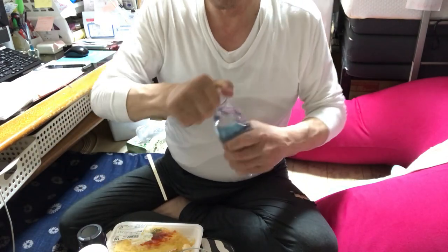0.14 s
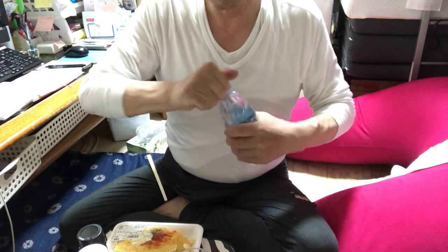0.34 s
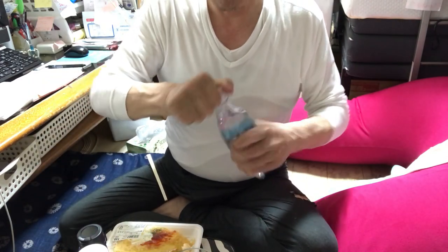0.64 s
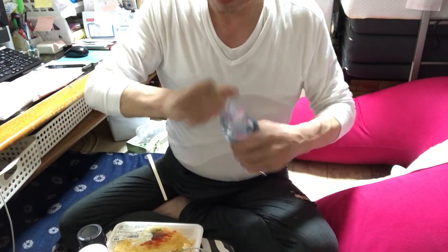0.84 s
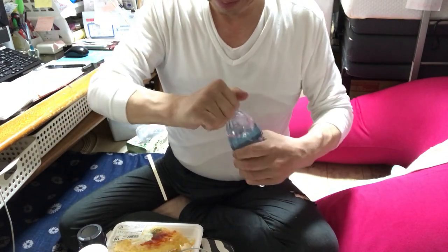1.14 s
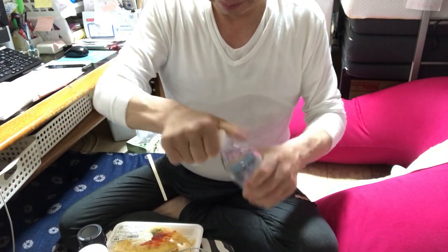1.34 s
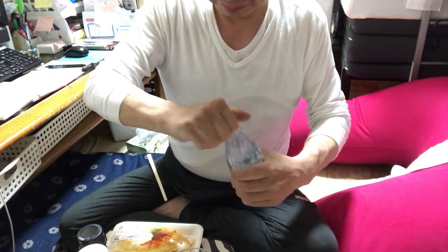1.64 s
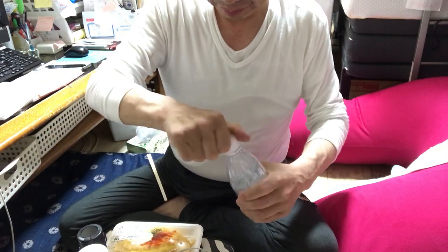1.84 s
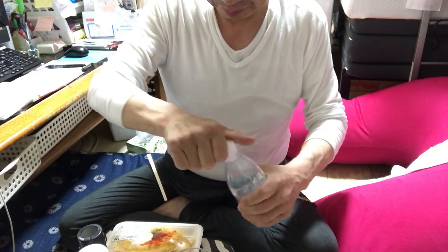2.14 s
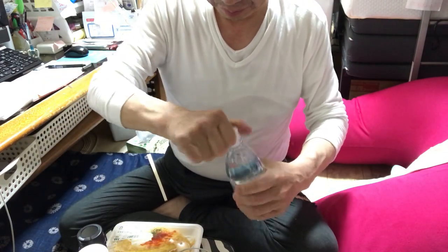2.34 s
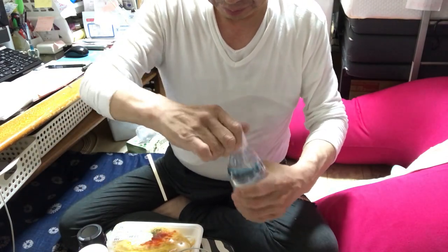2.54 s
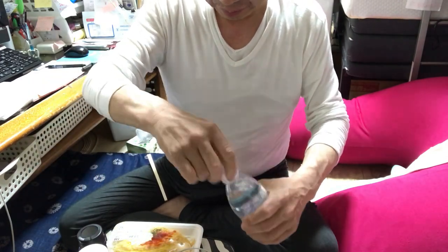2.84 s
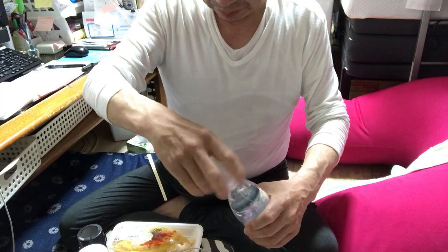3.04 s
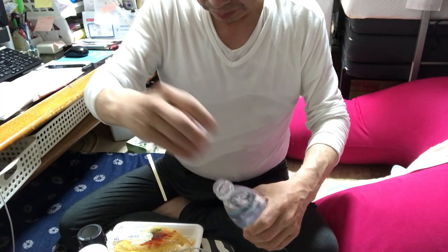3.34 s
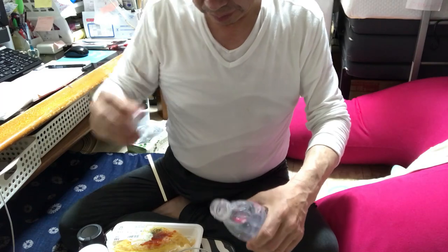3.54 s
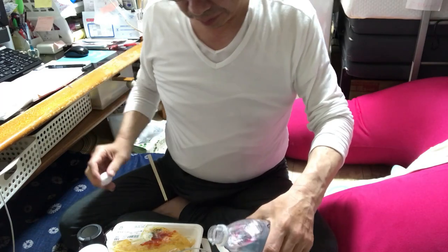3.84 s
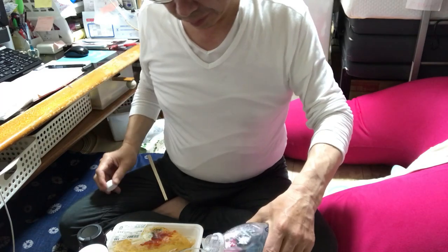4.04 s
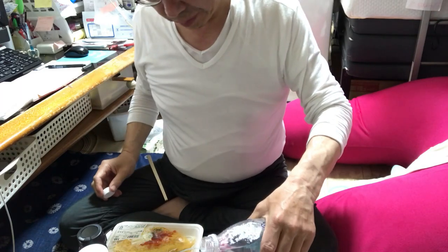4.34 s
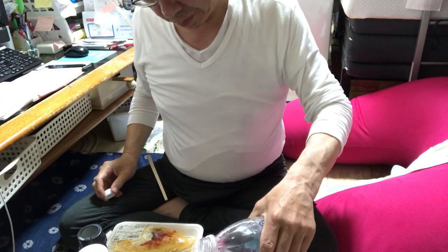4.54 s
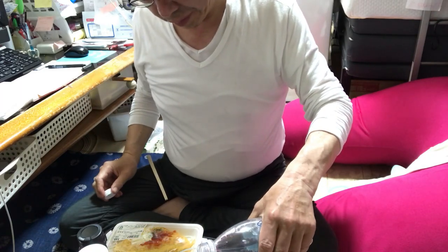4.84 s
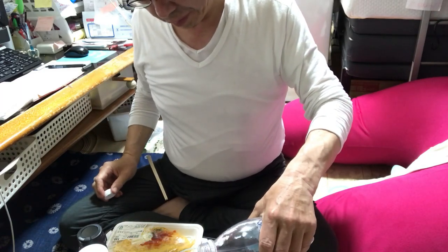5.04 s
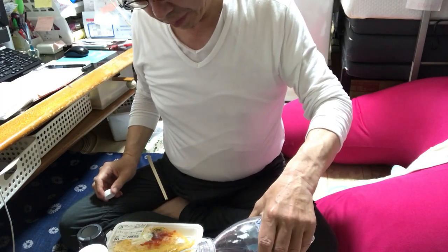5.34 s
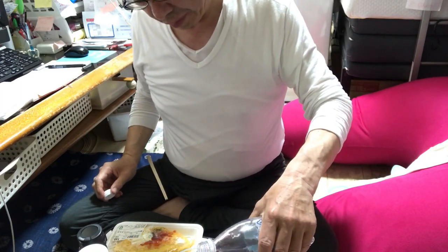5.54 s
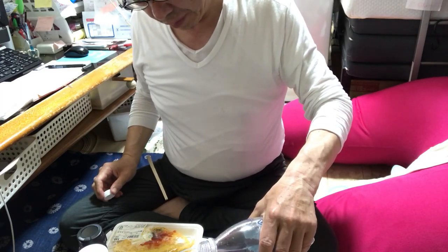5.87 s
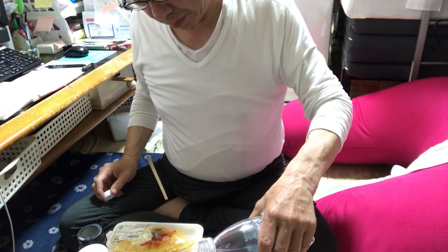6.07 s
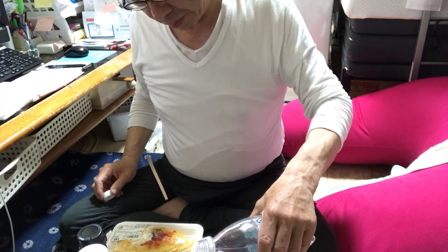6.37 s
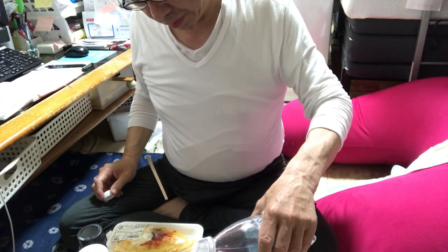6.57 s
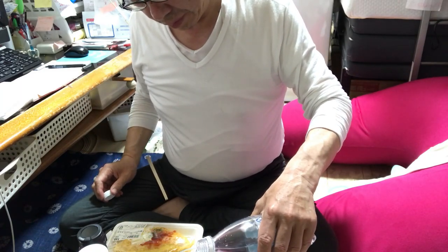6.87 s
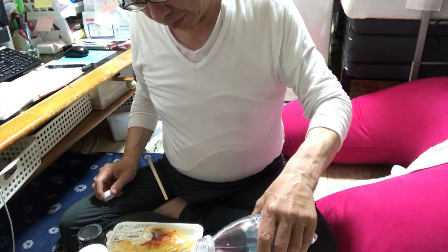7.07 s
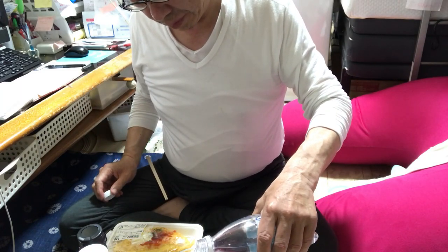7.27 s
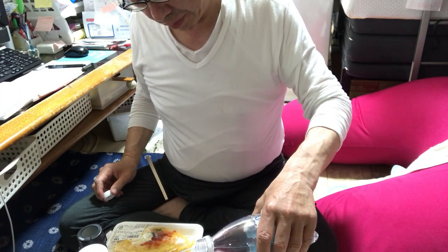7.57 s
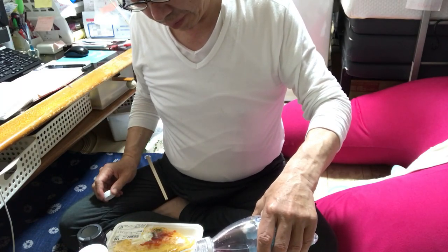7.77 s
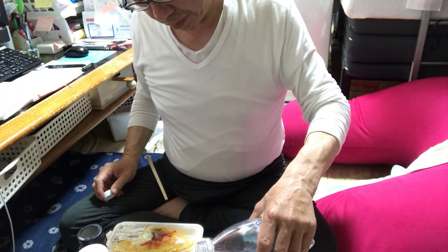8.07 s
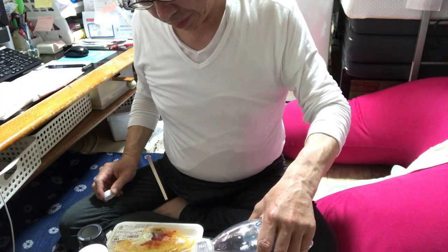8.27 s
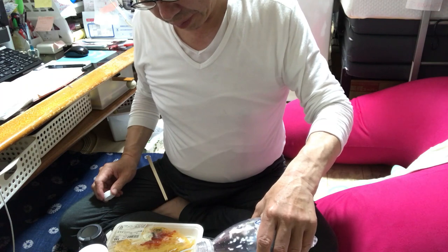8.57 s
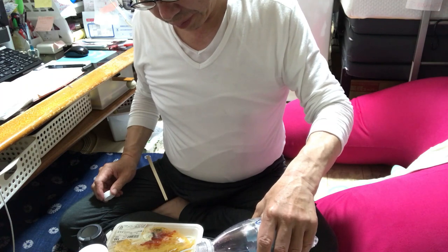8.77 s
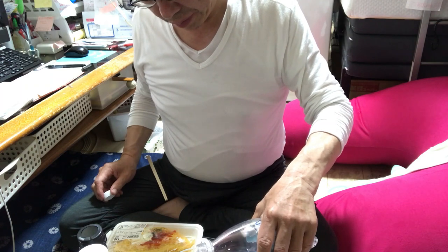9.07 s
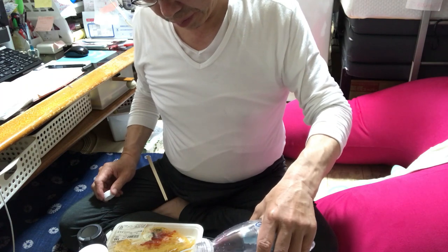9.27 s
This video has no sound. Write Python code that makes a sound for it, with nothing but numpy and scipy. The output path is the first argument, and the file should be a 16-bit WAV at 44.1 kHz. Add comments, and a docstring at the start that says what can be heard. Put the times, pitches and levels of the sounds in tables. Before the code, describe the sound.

Fingers rub a thin plastic bottle, then gas escapes in three separate bright hisses, closing with a muted pop. The cap ring cracks sharply, the loudest moment, and the cap ticks loosely off its thread. Later, soft sizzling drink fills a cup in several gushes, its hollow note mostly rising among liquid plops. Close microphone, dry little room, low humming appliance and faint air behind.

```python
"""In a small, well-damped room a thin plastic bottle of fizzy drink is opened and poured.
Three twists of the cap let gas hiss out as turbulent noise; the last ends in a dull pop. The cap's ring
snaps with a crack and ringing modes, and the cap ticks and scrapes off its thread under rubbing fingers.
The drink fizzes into a cup as dense grains, with a resonance that mostly rises and a few ringing plops.
An appliance hums in slow throbs over faint air noise and rumble."""
import sys
import numpy as np
from scipy import signal
from scipy.fft import rfft, irfft, next_fast_len
from scipy.io import wavfile

SR = 44100
rng = np.random.default_rng(int(sys.argv[2]) if len(sys.argv) > 2 else 0)


def unload_audio(sound):
    """Save the sound as a 16-bit wav file, at the path given as the first command line argument."""
    columns = np.transpose(np.atleast_2d(sound))
    # keep every value between -1 and 1, then stretch to whole-number steps
    steps = np.round(np.clip(columns, -1, 1) * 32767)
    wavfile.write(sys.argv[1], SR, steps.astype(np.int16))


N = 414981
TIME = np.arange(N) / SR


def from_db(db):
    """Logarithmic level to amplitude gain."""
    return 10 ** (np.asarray(db) / 20)


def rms_one(x):
    """Power normalisation: scale to unit mean square."""
    return x / np.sqrt(np.mean(x ** 2) + 1e-20)


def in_time(rows):
    """Linear interpolation: each column after the first (time_s), sample by sample."""
    time_s, *columns = np.transpose(rows)
    return [np.interp(TIME, time_s, column) for column in columns]


def during(start_s, end_s, edge_s=0.0049):
    """Gating: one between two times, with linear ramps centred on them."""
    return np.clip(np.minimum(TIME - start_s, end_s - TIME) / edge_s + .5, 0, 1)


def swell(start_s, end_s, rise_s, fall_s):
    """Exponential growth up to start_s, hold at one, exponential decay from end_s (time constants)."""
    exponent = np.minimum((TIME - start_s) / rise_s, (end_s - TIME) / fall_s).clip(None, 0)
    return np.exp(np.maximum(exponent, -20))


def noise(size=N):
    """White noise: equal power at all frequencies."""
    return rng.standard_normal(size)


def grains(per_s, spread_db):
    """Random point process: tiny clicks at random times, mostly weak, a few strong."""
    sizes = from_db(spread_db * np.minimum(rng.exponential(1, N), 5))
    signs = rng.choice([-1, 1], N)
    return sizes * signs * (rng.random(N) < per_s / SR)


def band(x, low_hz, high_hz):
    """Causal band-pass filtering."""
    sos = signal.butter(2, [low_hz, min(high_hz, .45 * SR)], "band", fs=SR, output="sos")
    return signal.sosfilt(sos, x)


def low_pass(x, cutoff_hz):
    """Zero-phase low-pass filtering, so that bands can be split by subtraction."""
    return signal.sosfiltfilt(signal.butter(4, cutoff_hz, fs=SR, output="sos"), x)


def coloured(x, spectrum):
    """Spectral shaping by (frequency_hz, density_db), falling away beyond its ends; unit power."""
    hz, db = np.transpose(spectrum)
    size = next_fast_len(len(x))
    f = np.maximum(np.fft.rfftfreq(size, 1 / SR), 1)
    beyond_ends = np.minimum(1, np.minimum(f / hz[0], hz[-1] / f)) ** 2
    gain = from_db(np.interp(np.log(f), np.log(hz), db)) * beyond_ends
    return rms_one(irfft(rfft(x, size) * gain, size)[:len(x)])


def narrow_noise(hz, width_hz, size=N):
    """Noise-driven resonance: two-pole low-passed noise moved up to hz, which may glide; unit power."""
    r = np.exp(-2 * np.pi * width_hz / SR)  # width_hz is the corner of each pole
    slow = signal.lfilter([1], [1, -2 * r, r * r], noise((2, size)))
    phase = 2 * np.pi * np.cumsum(hz + np.zeros(size)) / SR
    return rms_one(slow[0] * np.cos(phase) + slow[1] * np.sin(phase))


def brief_tone(start_s, end_s, hz, width_hz, edge_s):
    """Gated resonance: it sounds only between two times."""
    out = during(start_s, end_s, edge_s)
    sounding = np.flatnonzero(out)
    if len(sounding):
        out[sounding] *= narrow_noise(hz, width_hz, size=len(sounding))
    return out


def decay(t60_s, size=4096):
    """Exponential damping: 60 dB down after t60_s."""
    return from_db(-60 * TIME[:size] / t60_s)


def ring(hz, t60_s, size=4096):
    """Free vibration of one struck mode."""
    return np.sin(2 * np.pi * hz * TIME[:size]) * decay(t60_s, size)


def crack(spectrum, t60_s, rise_t60_s=0.00069, size=4096):
    """Impulsive fracture: a noise burst that builds up and dies at once, steady in strength."""
    envelope = decay(t60_s, size) * (1 - decay(rise_t60_s, size))
    burst = coloured(noise(size), spectrum) * envelope
    return rms_one(burst) * np.sqrt(np.mean(envelope ** 2))


def add(out, start_s, sound):
    """Superposition: mix a short sound in at a time."""
    at = round(start_s * SR)
    out[at:at + len(sound)] += sound[:N - at]


# Each twist opens a leak that swells once into a surge, then shuts:
# fully_open_s, closing_from_s, leak_db, opening_db_per_s, closing_db_per_s, surge_s, surge_db,
# surge_sigma_s, last_chuff_db (re flow), first_sizzle_db (re flow)
CAP_TWISTS = [(0.76, 1.062, -33.7, 2800, 380, 0.826, -28.3, 0.028, -19.5, -6.5),
              (1.19, 1.472, -38.4, 450, 560, 1.251, -28, 0.04, -14, -1.5),
              (1.572, 1.666, -37, 1250, 570, 1.641, -20.8, 0.036, -18, -6)]
LEAK_SAG_DB_PER_S = 15.5  # the pressure behind the leak runs down
SEEP_DB = -65  # gas that still seeps out between the first two twists
CHUFF_DB, SIZZLE_DB = -14.5, 0  # re flow: chuff at the start of a twist, sizzle at its end


def gas_flow():
    """Pressure-driven leakage: strength of the jet's middle, hollow chuff and high sizzle over all twists."""
    seep = from_db(SEEP_DB) * during(CAP_TWISTS[0][1], CAP_TWISTS[1][0])
    power = (seep * from_db([[0], [CHUFF_DB], [SIZZLE_DB]])) ** 2
    for (start, end, leak_db, opening, closing, surge_s, surge_db, sigma_s,
         last_chuff_db, first_sizzle_db) in CAP_TWISTS:
        gap_db = np.minimum(opening * (TIME - start), closing * (end - TIME))
        gap = from_db(np.clip(gap_db, -200, 0))
        leak = from_db(leak_db - LEAK_SAG_DB_PER_S * np.maximum(TIME - start, 0))
        surge = from_db(surge_db) * np.exp(-.5 * np.minimum(((TIME - surge_s) / sigma_s) ** 2, 20))
        # the sizzle brightens; the chuff thins in the first and third twists and holds in the second
        colour_db = in_time([(start, 0, CHUFF_DB, first_sizzle_db), (end, 0, last_chuff_db, SIZZLE_DB)])
        power = power + (gap * np.hypot(leak, surge) * from_db(colour_db)) ** 2
    return np.sqrt(power)


# Spectrum of the jet, later split into three bands: frequency_hz, density_db
JET_SPECTRUM = [(550, -37), (750, -28), (1080, -13.5), (1300, -17.5), (1650, -11), (1950, -2.5),
                (2230, -10), (2500, -3.5), (3000, -5), (4400, 0), (6500, 1), (8500, -0.5), (13500, 0.5),
                (15800, -3)]
# Resonances of the gap under the cap, which changes with each twist:
# start_s, end_s, pitch_hz, width_hz, level_db (re the flow)
GAP_RESONANCES = [(0.80, 0.87, 3370, 53, -10.5), (0.8, 1.0, 2650, 230, -19), (1.1, 1.5, 2050, 120, -21),
                  (0.88, 1.0, 4400, 380, -10), (1.2, 1.32, 2620, 290, -10.5), (1.15, 1.5, 2420, 130, -13.5),
                  (1.55, 1.655, 6850, 550, -10.5), (1.58, 1.68, 1050, 150, -21.5),
                  (0.78, 1.07, 14000, 900, -8), (1.655, 1.72, 13500, 900, -14)]


def gas(flutter_db=0.7):
    """Turbulent jet noise: gas leaves through the thread and excites the gap under the cap."""
    flow, chuff, sizzle = gas_flow()
    jet = coloured(grains(per_s=22000, spread_db=2.0), JET_SPECTRUM)
    low, low_and_middle = low_pass(jet, 2100), low_pass(jet, 11700)
    sound = chuff * rms_one(low)
    sound += flow * rms_one(low_and_middle - low)
    sound += sizzle * rms_one(jet - low_and_middle)
    tones = sum(from_db(db) * brief_tone(start, end, hz, width, edge_s=0.021)
                for start, end, hz, width, db in GAP_RESONANCES)
    flutter = from_db(flutter_db * narrow_noise(0, width_hz=45))
    return flutter * (sound + flow * tones)


POP_S, POP_DB = 1.656, -31  # the seal lets go
SNAP_S, SNAP_DB = 2.467, -17  # the cap's ring breaks
# Spectrum of the seal's pop: frequency_hz, density_db
POP_SPECTRUM = [(500, -8), (740, -17.5), (1100, 2.5), (1400, -6), (2500, -3), (5000, -1.5), (9000, -16.5)]
# Modes of the wall springing back: pitch_hz, level_db, t60_s
WALL_MODES = [(85, -46.5, .12), (135, -39.5, 0.075), (200.4, -39.5, .045), (275, -40, .035),
              (360, -36, 0.035), (490, -34, 0.027)]
# Spectrum of the breaking ring: frequency_hz, density_db
SNAP_SPECTRUM = [(200, -15), (400, -8), (620, -13), (880, -5), (1150, 2.5), (1700, -1), (2250, -12),
                 (2800, -11.5), (4150, 4), (5000, -3), (6300, -2.5), (8300, -12), (9900, -7), (10800, -12),
                 (15000, -11)]
# Modes of the cap: pitch_hz, level_db (before modes_db), t60_s
CAP_RING_MODES = [(1173, 2.5, 0.022), (1280, 3, 0.016), (1510, 3, 0.014), (1740, 4, 0.015),
                  (2870, -5, 0.031), (3820, -8, .025), (4270, -1, 0.022), (6000, -15, .02)]


def cap(modes_db=-28, rattle_db=-24):
    """Impulsive release and modal ringing: the seal pops; later the ring cracks and the thin wall rattles."""
    out = np.zeros(N)
    add(out, POP_S, from_db(POP_DB) * crack(POP_SPECTRUM, t60_s=.035))
    for k, (hz, db, t60_s) in enumerate(WALL_MODES):
        add(out, POP_S, (-1) ** k * from_db(db) * ring(hz, t60_s))  # neighbours in opposite phase
    add(out, SNAP_S, from_db(SNAP_DB) * crack(SNAP_SPECTRUM, t60_s=0.014))
    rattle = crack([(1200, -17), (2500, 4), (3800, 6), (6500, -3)], t60_s=0.15)
    add(out, SNAP_S, from_db(SNAP_DB + rattle_db) * rattle)
    for k, (hz, db, t60_s) in enumerate(CAP_RING_MODES):
        add(out, SNAP_S, (-1) ** k * from_db(modes_db + db) * ring(hz, t60_s))
    return out


# Spectrum of plastic scraping on plastic, also used by thread(): frequency_hz, density_db
SCRAPE_SPECTRUM = [(400, 10), (800, -4), (1200, 2), (2200, -1.5), (3300, -0.5), (5000, -12), (6500, -6),
                   (9000, -19), (15000, -19)]
# Ticks of cap, thread and bottle wall, all levels before the common gains below:
# start_s, level_db, low_db, middle_db, high_db (these three re level_db), pitch_hz
PLASTIC_TICKS = [(0.289, -51, -35, -5.5, -12, 1700), (0.422, -48, -18, -13.5, -21, 444),
                 (0.544, -39, -17, -32, -25, 1130), (0.706, -47, -13, -15, -26, 1460),
                 (0.758, -25, -23, -11.5, -26, 2600), (2.067, -30.5, -52, -27, -8, 8800),
                 (2.142, -38, -22, -19, -26, 2280), (2.162, -50.5, -23, -8, -5, 5090),
                 (2.641, -52.5, -30, -10, -7, 708), (2.682, -48.5, -8.5, -20, -28, 1620),
                 (2.816, -38.5, -16, -7, -29, 3020), (2.906, -40, -14.5, -10, -26, 2280),
                 (2.911, -43, -14, -5.5, -24, 1310), (2.925, -47, -8, -10, -20, 2150),
                 (2.929, -32.5, -17, -12.5, -27, 1060), (3.003, -37.5, -9, -10, -34, 1880),
                 (3.031, -47, -8, -14, -24, 1060), (3.101, -26, -22.5, -22, -33, 2270),
                 (3.115, -38, -13, -17, -28, 436), (3.123, -34.5, -15, -12, -14, 500),
                 (3.191, -34.5, -22, -23, -35, 450), (3.31, -47, -11, -12, -18, 2550),
                 (3.694, -51, -18, -29, -11, 700), (4.261, -52, -21, -28, -10, 1030),
                 (4.321, -52.5, -31, -17, -3, 476), (4.465, -46.5, -25, -15, -9.5, 4380),
                 (4.939, -39, -40, -25, -10, 7300)]


def ticks(tick_db=5, edge_db=4, ring_db=-12, ring_cycles=22, skid_db=-16):
    """Stick-slip impact: each slip of plastic is a sharp edge, a crack and a skid; a patch of wall rings."""
    out = np.zeros(N)
    for start, level_db, low, middle, high, hz in PLASTIC_TICKS:
        low_spectrum = [(450, -4.0), (1100, 0.5), (1800, -3)]
        middle_spectrum = [(2000, -2.5), (3500, 5.0), (6500, -5.5)]
        body = from_db(low) * crack(low_spectrum, t60_s=0.027, rise_t60_s=0.0051)
        body += from_db(middle) * crack(middle_spectrum, t60_s=0.023, rise_t60_s=.004)
        body += from_db(middle + skid_db) * crack(SCRAPE_SPECTRUM, t60_s=0.099, rise_t60_s=0.018)
        body += from_db(high + edge_db) * crack([(7500, 0), (15000, 0)], t60_s=0.0059)
        wall = from_db(ring_db) * ring(hz, 0.011 + ring_cycles / hz)
        add(out, start, from_db(level_db) * (from_db(tick_db) * body + wall))
    return out


THREAD_FROM_S, THREAD_TO_S = 2.8, 3.4
THREAD_DB, THREAD_FADE_DB_PER_S = -67.5, 10  # the loose cap scrapes ever more lightly


def thread(catch_db=4):
    """Sliding friction: the cap catches unevenly on its thread as it is spun off."""
    level_db = THREAD_DB - THREAD_FADE_DB_PER_S * (TIME - THREAD_FROM_S)
    level_db = level_db + catch_db * narrow_noise(0, width_hz=29)
    scrape = coloured(grains(per_s=730, spread_db=5.0), SCRAPE_SPECTRUM)
    return from_db(level_db) * during(THREAD_FROM_S, THREAD_TO_S, edge_s=0.034) * scrape


# Fingers rubbing on cap and bottle; the slow fade at 1.77 s is fizz left in the bottle:
# peak_s, level_db (before rub_db), rise_s, fall_s (time constants)
RUBS_AND_FIZZ = [(0.064, -52.5, 0.011, 0.017), (0.35, -63.5, 0.14, 0.082), (0.549, -45.5, 0.0069, 0.019),
                 (0.74, -59.5, 0.03, 0.01), (1.77, -60.5, 0.01, 0.28), (2.144, -71, 0.006, 0.023),
                 (2.238, -59.5, 0.015, 0.019), (2.695, -62, 0.053, 0.018), (2.8, -66, 0.067, 0.01)]
# Spectrum of skin on plastic, which also colours that fizz: frequency_hz, density_db
SKIN_SPECTRUM = [(400, -13.5), (560, -4.5), (750, -14.5), (1100, -3), (1400, -8.5), (1720, -6), (2100, -7),
                 (4400, -8), (7000, -12), (11000, -15.5), (15500, -16)]
# The squeezed wall creaks in one of its resonances: start_s, end_s, pitch_hz, level_db
WALL_CREAKS = [(0.056, 0.077, 1050, -59.5), (0.539, 0.585, 550, -59), (0.54, 0.567, 1094, -51.5),
               (0.539, 0.555, 1700, -49), (0.746, 0.87, 451, -62), (0.951, 1.047, 478, -68),
               (1.346, 1.485, 440, -68)]


def fingers(rub_db=-3.5):
    """Stick-slip friction: skin jerks over the plastic, the gripped wall creaks; one slow fade is fizz."""
    strength = sum(from_db(db) * swell(s, s, rise, fall) for s, db, rise, fall in RUBS_AND_FIZZ)
    rustle = strength * coloured(grains(per_s=3500, spread_db=3.0), SKIN_SPECTRUM)
    creaks = sum(from_db(db) * brief_tone(start, end, hz, width_hz=67, edge_s=.012)
                 for start, end, hz, db in WALL_CREAKS)
    return from_db(rub_db) * rustle + creaks


# Gushes of drink into the cup: start_s, end_s, fizz_db, foam_db (both before the gains of pour)
GUSHES = [(5.148, 5.32, -70, -71), (5.448, 5.796, -61, -69.5), (5.8, 6.0, -79, -69),
          (6.425, 6.53, -59, -70), (6.62, 7.198, -62.5, -89), (7.254, 7.94, -61, -66),
          (8.81, 8.996, -71, -67)]
# Spectrum of bursting bubbles: frequency_hz, density_db
FIZZ_SPECTRUM = [(1760, -59), (3000, -7.5), (3720, -2.5), (4980, -1.5), (5420, -1.5), (6630, -1.5),
                 (9450, -4.5), (10500, -3.5), (11400, -6), (14200, -7.5), (15800, -12)]
# Spectrum of churning foam: frequency_hz, density_db
FOAM_SPECTRUM = [(1100, -6), (1500, -5.5), (2000, -2.5), (2250, -6.5), (2500, -6.5), (2700, -6),
                 (3600, -6.5), (4300, -10.5), (5000, -25)]
# Resonance of the air above the drink: time_s, pitch_hz
CUP_RESONANCE = [(5.0, 1022), (5.4, 1067), (5.9, 1171), (6.9, 1195), (7.35, 1270), (7.47, 1720),
                 (7.7, 1754), (8.2, 1615), (9.4, 1673)]
GUSH_RISE_S, GUSH_FALL_S = 0.052, 0.1  # time constants
# the head of foam goes on fizzing between gushes; it grows coarser as it stands
HEAD_S, HEAD_BUILD_S = 4.91, 0.13
# head levels before the gains of pour
HEAD_FIZZ_DB, HEAD_FIZZ_DB_PER_S = -64, -1.05
HEAD_FOAM_DB, HEAD_FOAM_DB_PER_S = -73.5, 1.45
NOTE_FADE_DB_PER_S = 2.05  # re the foam: the cup rings less as it fills
UPPER_NOTE_HZ, UPPER_NOTE_DB = 2426, -8.5  # a second, fainter resonance of the cup; dB re the note


def pour(fizz_db=1, foam_db=-1.0):
    """Bubble bursting and air-column resonance: gas bubbles burst while the air in the cup rings along."""
    age_s = np.maximum(TIME - HEAD_S, 0)
    head = 1 - np.exp(-age_s / HEAD_BUILD_S)
    fizz = head * from_db(HEAD_FIZZ_DB + HEAD_FIZZ_DB_PER_S * age_s)
    foam = head * from_db(HEAD_FOAM_DB + HEAD_FOAM_DB_PER_S * age_s)
    for start, end, gush_fizz_db, gush_foam_db in GUSHES:
        gush = swell(start, end, GUSH_RISE_S, GUSH_FALL_S)
        fizz = np.hypot(fizz, from_db(gush_fizz_db) * gush)
        foam = np.hypot(foam, from_db(gush_foam_db) * gush)
    note = narrow_noise(in_time(CUP_RESONANCE)[0], width_hz=98)
    note = note + from_db(UPPER_NOTE_DB) * narrow_noise(UPPER_NOTE_HZ, width_hz=77)
    note_level = from_db(-NOTE_FADE_DB_PER_S * age_s) * foam * (TIME > DROPS[0][0])  # from the first drop
    sound = from_db(fizz_db) * fizz * coloured(grains(per_s=8000, spread_db=3.5), FIZZ_SPECTRUM)
    sound += from_db(foam_db) * foam * coloured(grains(per_s=1500, spread_db=3.0), FOAM_SPECTRUM)
    return sound + note_level * note


# Drops and large bubbles, levels before the common gains below:
# start_s, level_db, pitch_hz, splash_db (re level_db)
DROPS = [(5.133, -27.5, 1043, -33), (5.148, -59, 1030, -12), (5.462, -43, 2440, -16),
         (5.792, -42.5, 1140, -15), (6.407, -37, 1970, -10.5), (6.454, -45.5, 1394, -4),
         (6.616, -42.5, 1180, -6), (6.761, -37, 3850, -21), (6.833, -41.5, 2900, -9.5),
         (7.21, -28, 1193, -26), (7.226, -31.5, 1150, -20), (7.235, -35.5, 1050, -10.5),
         (7.291, -31, 5370, -18), (7.373, -33.5, 1950, -17), (7.493, -39, 1740, -10), (7.67, -29, 4500, -8),
         (7.699, -37, 1765, -12), (7.94, -38.5, 1344, -22), (7.943, -39, 2060, -17),
         (7.987, -41, 4700, -9.5), (8.893, -42, 2070, -16)]


def plops(bubble_db=-6, splash_db=1, patter_db=-16, cycles=32):
    """Bubble resonance: a trapped bubble rings; smaller ones patter around its pitch under a fine splash."""
    out = np.zeros(N)
    for start, level_db, hz, splash in DROPS:
        bubble = ring(hz, cycles / hz) * (1 - decay(t60_s=0.0024))
        patter_spectrum = [(1.17 * hz, 0), (0.78 * hz, -3), (2.0 * hz, -16)]
        patter = crack(patter_spectrum, t60_s=0.023, rise_t60_s=0.0091)
        spray = crack([(2000, -28), (3000, -2.5), (4500, -6), (14000, -13)], t60_s=0.023)
        plop = from_db(bubble_db) * bubble + from_db(patter_db) * patter
        plop += from_db(splash + splash_db) * spray
        add(out, start, from_db(level_db) * plop)
    return out


OPEN_S = 2.6  # from here on the drink stands open to the air


def prickle(per_s=20, prick_db=-67, spread_db=4, cycles=40, count=12):
    """Bubble-burst ringing: lone bubbles on the open drink each give a tiny ping at one of count pitches."""
    pings = sum(signal.oaconvolve(grains(per_s / count, spread_db), ring(hz, cycles / hz))[:N]
                for hz in np.geomspace(4500, 15000, count))
    return from_db(prick_db) * pings * (TIME > OPEN_S)


# Times at which the throbbing hum sinks into a lull: time_s
LULL_TIMES = [-0.55, 1.93, 3.76, 5.28, 6.37, 7.5, 8.43, 9.4]
MAINS_HZ = 60.3
HUM_THROB_DB, HUM_LULL_DB = -59.5, -74  # the throbbing part at its top; the part that stays in a lull
# Steady tones of the motor: pitch_hz, level_db
MOTOR_TONES = [(90.2, -68.5), (119.3, -87.5), (179, -85.5)]
# Spectrum of low rumble: frequency_hz, density_db
RUMBLE_SPECTRUM = [(15, -21), (33, -5), (50, 5.5), (80, -1), (110, -2), (160, -17.5)]
# Spectrum of the still air of the room: frequency_hz, density_db
AIR_SPECTRUM = [(65, -32), (110, -6.5), (147, -8.5), (425, -8.5), (523, -14), (685, -11), (744, -16),
                (1080, -14), (1640, -20.5), (1980, -19.5), (3060, -24), (6600, -26.5), (8470, -32),
                (12300, -30), (15800, -40)]
RUMBLE_DB, AIR_DB = -69, -67


def background():
    """Amplitude modulation: an appliance's hum slowly throbs over steady tones, rumble and still air."""
    throb = np.sin(np.pi * np.interp(TIME, LULL_TIMES, np.arange(len(LULL_TIMES))))
    hum_level = np.hypot(from_db(HUM_THROB_DB) * throb, from_db(HUM_LULL_DB))
    hum = hum_level * np.sqrt(2) * np.sin(2 * np.pi * MAINS_HZ * TIME)
    motor = sum(from_db(db) * np.sqrt(2) * np.sin(2 * np.pi * (hz * TIME + rng.random()))
                for hz, db in MOTOR_TONES)
    rumble = from_db(RUMBLE_DB) * coloured(noise(), RUMBLE_SPECTRUM)
    air = from_db(AIR_DB) * coloured(noise(), AIR_SPECTRUM)
    return hum + motor + rumble + air


DISTANCE_M, ROOM_T60_S = .6, 0.13


def room(x, near_db, tail_db, size=12000):
    """Reverberation: direct sound, bright near scatter, then a short tail that dies sooner in the treble."""
    near = band(noise(size), 2500, 16000) * decay(0.033, size) * (TIME[:size] > .001)
    tail = band(noise(size), 150, 6000) * decay(ROOM_T60_S, size)
    tail += 0.66 * band(noise(size), 6500, 16000) * decay(0.075, size)
    tail *= TIME[:size] > .003
    # levels are energies relative to the direct sound
    response = (from_db(near_db) * rms_one(near) + from_db(tail_db) * rms_one(tail)) / np.sqrt(size)
    response[0] = 1
    travel = np.zeros(round(DISTANCE_M / 343 * SR))
    return signal.fftconvolve(x, np.r_[travel, response / np.linalg.norm(response)])[:N]


def scene():
    """Superposition: the bottle and the cup, each in the room, over the background hum."""
    bottle = room(gas() + cap() + ticks() + thread() + fingers(), near_db=-9.0, tail_db=-14.5)
    cup = room(pour() + plops() + prickle(), near_db=-11, tail_db=-15.0)
    return (bottle + cup + background())[None]


# Dips cut by the microphone's port: frequency_hz, width_hz, level_db
PORT_DIPS = [(4905, 450, -4), (8200, 470, -1), (10400, 800, -7)]
CUTOFF_HZ = 15850


def record(dry):
    """Band limitation: the microphone's port cuts a few narrow dips and the top is cut off steeply."""
    for hz, width_hz, db in PORT_DIPS:
        peak = signal.lfilter(*signal.iirpeak(hz, hz / width_hz, fs=SR), dry)
        dry = dry + (from_db(db) - 1) * peak
    return signal.sosfilt(signal.ellip(12, .1, 80, CUTOFF_HZ, fs=SR, output="sos"), dry)


dry = scene()
out = record(dry)
unload_audio(out)
```